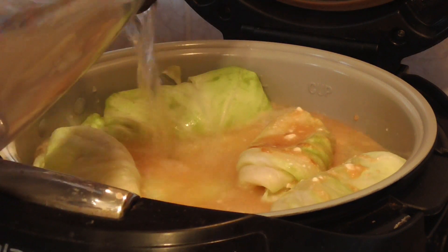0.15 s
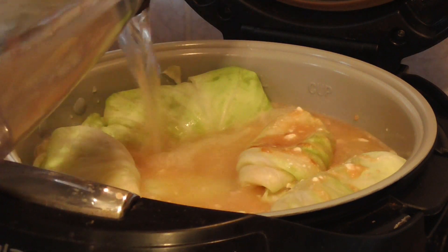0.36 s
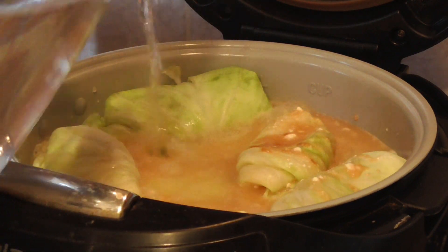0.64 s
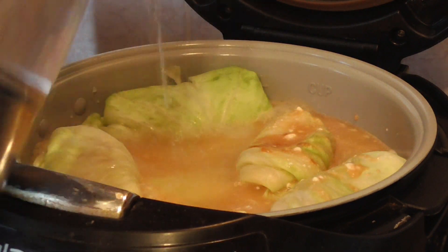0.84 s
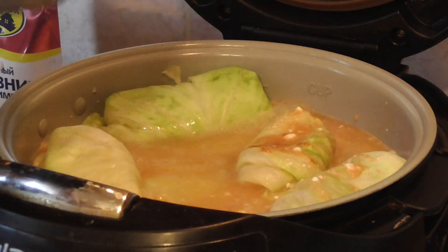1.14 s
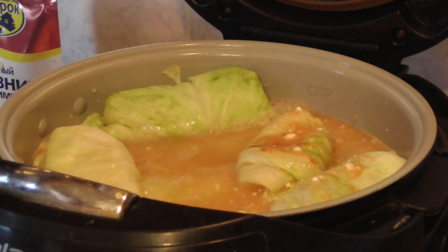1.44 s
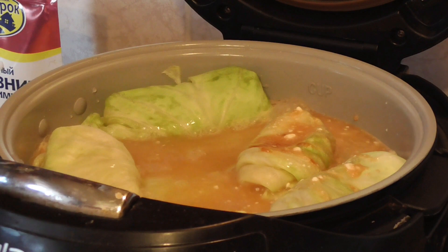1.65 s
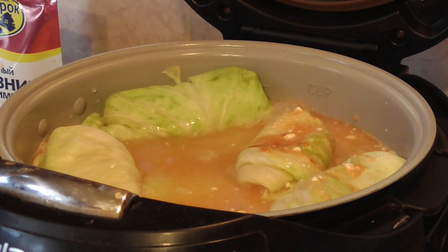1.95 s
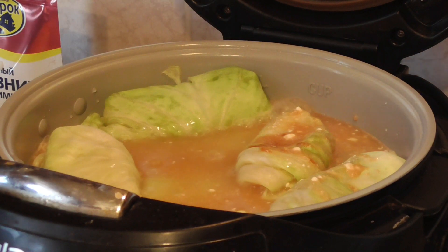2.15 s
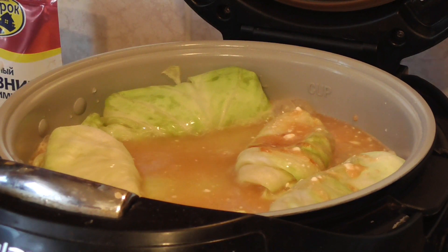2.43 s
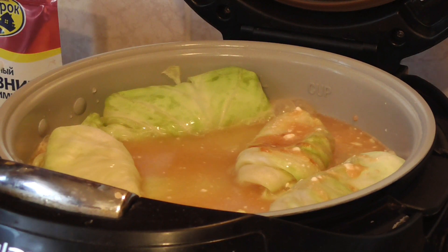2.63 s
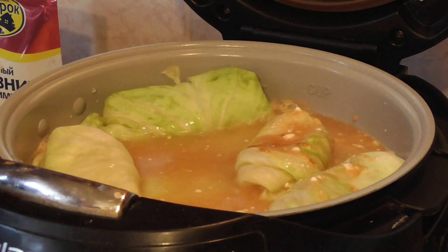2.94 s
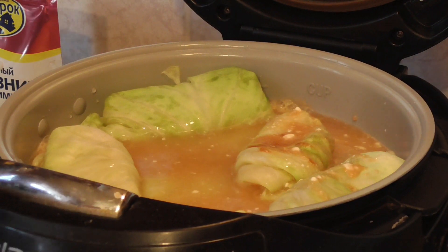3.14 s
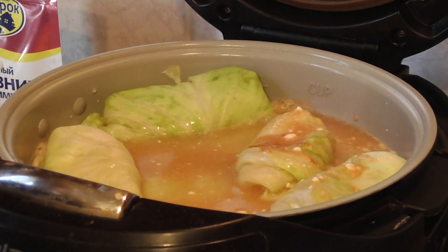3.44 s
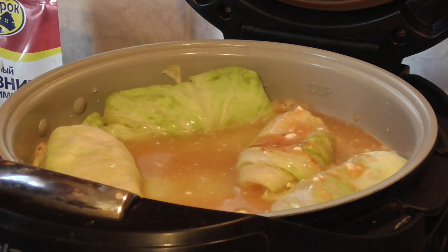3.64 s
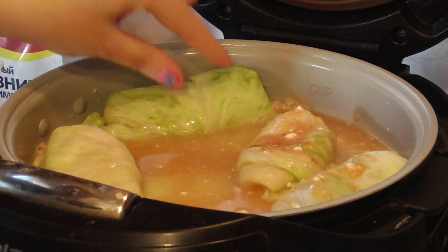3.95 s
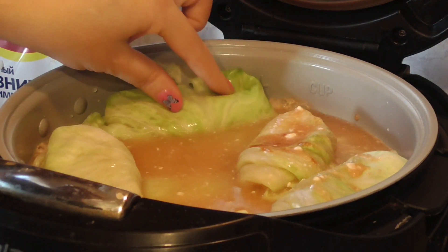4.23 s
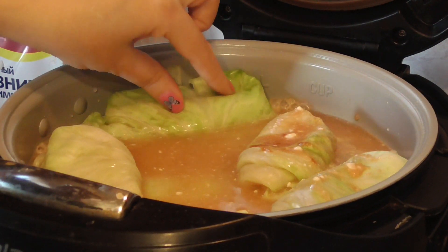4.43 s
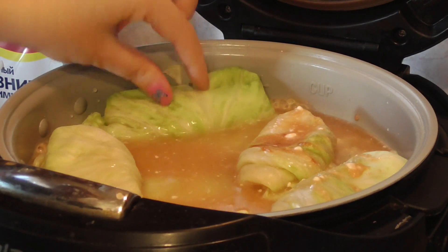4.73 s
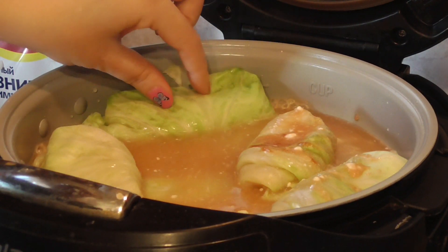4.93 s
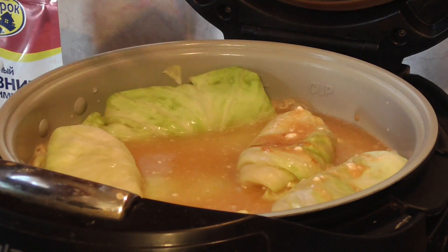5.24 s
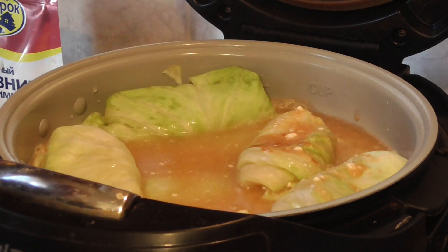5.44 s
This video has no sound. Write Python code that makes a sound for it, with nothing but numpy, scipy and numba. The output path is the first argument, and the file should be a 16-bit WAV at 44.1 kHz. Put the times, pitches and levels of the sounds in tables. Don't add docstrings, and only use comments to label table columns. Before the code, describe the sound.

Close bubbling pour ends with a jug thumped down, followed by a wooden clatter, a hard door slam, and quiet fridge hum.

```python
import sys
import numpy as np
from scipy import signal
from scipy.fft import rfft, irfft
from scipy.io import wavfile
from scipy.ndimage import uniform_filter1d
from numba import njit

SR = 44100
rng = np.random.default_rng(int(sys.argv[2]) if len(sys.argv) > 2 else 0)


def amplitude_ratio(level_db):
    exponent = np.asarray(level_db, float) / 20
    return 10 ** exponent


def inscribe(sig):
    pcm = np.round(np.clip(np.atleast_2d(sig).T, -1, 1) * 32767)
    wavfile.write(sys.argv[1], SR, pcm.astype(np.int16))


N = 246078


def at(table, hz):
    table = np.array(table, float)
    return np.interp(np.log(np.maximum(hz, 1)), np.log(table[:, 0]), table[:, 1])


def unit(x):
    return x / np.sqrt(np.mean(x ** 2))


def colour(x, table):
    size = x.shape[-1]
    return irfft(rfft(x) * amplitude_ratio(at(table, np.fft.rfftfreq(size, 1 / SR))), size)


# (frequency [Hz], likeness [0-1])
LIKENESS = [(60, 0.7), (300, 0.79), (700, 0.33), (3000, 0.24), (7000, 0), (15000, 0)]


def wide_noise(size):
    like = np.clip(at(LIKENESS, np.fft.rfftfreq(size, 1 / SR)), 0, 1)
    mid, side = rfft(rng.standard_normal((2, size))) * np.sqrt([1 + like, 1 - like])
    return irfft([mid + side, mid - side], size) / np.sqrt(2)


def narrow_noise(size, width):
    mid, side = rng.standard_normal((2, size))
    return mid + width * side * np.array([[1], [-1]])


def walk(rate_hz):
    hold = int(SR / rate_hz)
    return uniform_filter1d(np.repeat(rng.standard_normal(N // hold + 1), hold), hold)[:N]


def add(out, s, sound, pan_db):
    i = int(s * SR)
    sound = np.atleast_2d(sound)[:, :N - i]
    out[:, i:i + sound.shape[1]] += sound * amplitude_ratio(np.array([[pan_db], [-pan_db]]) / 2)


@njit
def grains(start, hz, cycles, glide, size, length, rate):
    out = np.zeros(length)
    for k in range(len(start)):
        step, phase, a = 2 * np.pi * hz[k] / rate, 0., size[k]
        life = cycles[k] * rate / hz[k]
        for i in range(start[k], min(start[k] + int(3 * life), length)):
            out[i] += a * np.sin(phase)
            phase += step
            step *= 1 + glide / life
            a *= np.exp(-2 / life)
    return out


# (time [s], flow [dB])
FLOW = [
    (0, 0),
    (0.2, -3.5),
    (0.31, -0.5),
    (0.45, -1.5),
    (0.79, 0.5),
    (0.87, 2.5),
    (0.98, 6),
    (1.04, -6),
    (1.25, -19),
    (2.15, -20.5),
]


def swarm(level_db, hz, spread_oct, cycles, rate_hz, sizes_db, glide):
    shower_s = 2.2
    when, pitch, rank, place = rng.random((8000, 4))[:int(rate_hz * shower_s)].T
    start = (when * shower_s * SR).astype(np.int64)
    pitch_hz = np.clip(hz * 2 ** (spread_oct * (2 * pitch - 1)), 100, 16000)
    size = amplitude_ratio(-sizes_db * np.log(1 - 0.73 * rank))
    cycles = np.full(len(size), cycles)
    both = []
    for side in (.8, -.8):
        one_side = size * np.sqrt(1 + side * (place - .5))
        both.append(grains(start, pitch_hz, cycles, glide, one_side, N, 1. * SR))
    rms = np.sqrt(np.mean(both[0][:int(shower_s * SR)] ** 2))
    flowing = np.arange(N) < FLOW[-1][0] * SR
    return np.array(both) / rms * amplitude_ratio(level_db) * flowing


def stream():
    t = np.arange(N) / SR
    flow_db = np.interp(t, *np.transpose(FLOW))
    clump_db, clumps_hz = 4.5, 45
    plop_db = -56.5 + 0.93 * flow_db + clump_db * walk(clumps_hz)
    bubble_db = -60 + flow_db + clump_db * walk(clumps_hz)
    fizz_db = -61.5 + 1.3 * flow_db + clump_db * walk(clumps_hz)
    foam_db = -65.5 - 6 * np.maximum(t - 1, 0)
    fine_db = 10 * np.log10(amplitude_ratio(2 * fizz_db) + amplitude_ratio(2 * foam_db))
    out = swarm(plop_db, hz=1250, spread_oct=1.3, cycles=3., rate_hz=700, sizes_db=3.5, glide=.1)
    out += swarm(bubble_db, hz=4020, spread_oct=0.4, cycles=9., rate_hz=700, sizes_db=5.5, glide=0.13)
    out += swarm(fine_db, hz=10500, spread_oct=.5, cycles=4., rate_hz=3500, sizes_db=3., glide=.05)
    return out


def bursts(table, gain_db, t60_s, spray_db):
    out, size = np.zeros((2, N)), 2048
    t, f = np.arange(size) / SR, np.fft.rfftfreq(size, 1 / SR) + 1
    fade = np.exp(-np.log(1000) * t / max(t60_s, .002)) * np.minimum(t / 0.0013, 1)
    splatter = .11 * np.exp(-t / .012) * np.minimum(t / .002, 1)
    for s, db, hz, *pan_db in table:
        ring = np.sin(2 * np.pi * hz * t * (1 + 4 * t)) * min(2500 / hz, .8)
        peak = np.exp(-(np.log2(f / hz) / 0.3) ** 2)
        skirts = 0.42 * np.minimum(f / hz, hz / f) ** .5 * (f > 350)
        spray = unit(irfft(rfft(narrow_noise(size, width=0.52)) * (peak + skirts), size))
        burst = .5 * ring * fade + amplitude_ratio(spray_db) * 0.56 * spray * (fade + splatter)
        add(out, s, amplitude_ratio(db + gain_db) * burst, sum(pan_db))
    return out


# (time [s], peak level [dB], pitch [Hz], left minus right [dB])
POPS = [(0.021, -30, 10250, 0.5), (0.0332, -30, 9550, -4), (0.0385, -33, 9800, 2), (0.0435, -34, 9800, 0.0),
        (0.1186, -40, 9880, 1), (0.1645, -43, 7300, 0.0), (0.2059, -43, 9570, 0.0), (0.2665, -31, 10500, 1),
        (0.274, -28, 9800, 1), (0.2947, -36, 12100, -2), (0.3182, -32, 10400, -0.5),
        (0.3411, -37, 9060, 0.0), (0.3674, -33, 8850, 2), (0.377, -21.5, 8830, 1),
        (0.4304, -35, 12100, -0.5), (0.5354, -29.5, 9640, 0.0), (0.5643, -36, 9350, 0.0),
        (0.5731, -37, 9060, 3), (0.583, -37, 12500, 0.0), (0.6195, -20.5, 11800, -1.5),
        (0.639, -35, 9870, 1), (0.6473, -33, 8700, 0.0), (0.6878, -31.5, 10400, 0.0),
        (0.71, -28, 11400, -1), (0.7387, -30, 8750, 0.0), (0.767, -35, 12700, -4), (0.8095, -30, 9000, 4),
        (0.8374, -28, 9400, 0.0), (0.8415, -25, 11500, -0.5), (0.8468, -22, 11300, -1.0),
        (0.8724, -31, 6700, 0.0), (0.9225, -28, 11900, -2.0), (0.9315, -33, 6950, -2.0),
        (0.9567, -35, 9500, 0.0)]
# (time [s], peak level [dB], pitch [Hz], left minus right [dB])
BUBBLES = [(0.112, -44, 3200, 0.0), (0.1195, -44, 3460, 0.0), (0.166, -51, 3540, 9),
           (0.1905, -43.5, 3880, 2), (0.2109, -53, 3570, 0.0), (0.2374, -40.5, 3400, 4),
           (0.2493, -37, 3400, -0.5), (0.2663, -37, 4620, 0.5), (0.3403, -45, 3600, 3),
           (0.407, -39, 3550, -1), (0.4713, -36.5, 3920, -1), (0.5087, -37.5, 3770, 0.5),
           (0.5806, -38, 4450, -1.0), (0.7812, -37.5, 4230, -8), (0.8076, -28, 4060, 0.5),
           (0.8105, -29, 4300, 0.5), (0.873, -32, 3500, 1), (0.8865, -25.5, 4210, -1),
           (0.9314, -31, 4250, 0.5), (0.9554, -52, 3450, -1.0), (0.9835, -37, 5600, -0.5),
           (0.997, -45, 3900, -0.5), (1.0114, -40.5, 4040, 0.5)]
# (time [s], peak level [dB], pitch [Hz])
TICKS = [(1.2555, -49, 7050), (1.4874, -49, 6870), (1.4995, -47, 11200), (1.8027, -50, 10600),
         (1.947, -45, 11800), (2.0373, -51, 8500), (2.087, -47, 10500), (2.1888, -43, 8400),
         (2.2114, -48, 5000), (3.1314, -49, 7500), (3.5932, -45, 12450), (3.6107, -39.5, 7640),
         (4.0746, -50, 14400), (4.116, -50, 7500), (4.6144, -49, 11800), (4.6773, -47, 6500),
         (5.01, -51, 15000), (5.3114, -43, 6910), (5.5035, -48.5, 9320)]
# (time [s], peak level [dB], pitch [Hz])
DRIPS = [
    (1.0444, -45, 4560),
    (1.18, -50, 2440),
    (2.124, -51, 2100),
]
# (time [s], peak level [dB], pitch [Hz])
PLOPS = [(.058, -33, 1230), (.212, -29, 1140), (.238, -33, 1650), (.283, -31, 1350), (.318, -34, 690),
         (.376, -36, 1310), (.4055, -26.5, 1260), (.408, -28.5, 640), (.42, -29, 1500), (.459, -31.5, 1000),
         (.637, -26, 930), (.665, -29, 920), (.74, -30, 1490), (.792, -28, 1500), (.807, -33.5, 1100),
         (.887, -28, 1190), (1.213, -35.5, 774), (1.565, -38.5, 805), (3.612, -39, 1160),
         (4.618, -41.5, 1110)]


def water():
    out = stream()
    out += bursts(POPS, gain_db=12.9, t60_s=0.0074, spray_db=-8)
    out += bursts(BUBBLES, gain_db=3.8, t60_s=0.018, spray_db=-4)
    out += bursts(TICKS, gain_db=0.1, t60_s=0.0097, spray_db=3.9)
    out += bursts(DRIPS, gain_db=-3, t60_s=.012, spray_db=8)
    out += bursts(PLOPS, gain_db=-8, t60_s=.022, spray_db=3)
    return out


# (frequency [Hz], density [dB per Hz])
DULL_CRACK = [(880, -35), (1500, -5), (2720, -11.5), (3060, -10), (5020, -10.5), (6560, -17), (10700, -18),
              (16000, -38)]


def blows(table, body, rise_s, crack_s, low_hz, edge=DULL_CRACK, edge_pan_db=0., late_samples=0):
    out, t = np.zeros((2, N)), np.arange(int(.5 * SR)) / SR
    hz, mode_db, t60_s = np.transpose(body)[:, :, None]
    high_pass = signal.butter(2, low_hz, "high", fs=SR, output="sos")
    body_size = np.sqrt(np.sum(amplitude_ratio(2 * mode_db)))
    for s, db, crack_db, pan_db, *tilt_db in table:
        spread = np.array([1.5, .012, .35])[:, None, None]  # dB, share of pitch, rad
        gain_db, detune, phase = rng.standard_normal((3, len(body), 1)) * spread
        size = amplitude_ratio(mode_db + gain_db + sum(tilt_db) * np.log2(hz / 550))
        modes = size * np.sin(2 * np.pi * hz * (1 + detune) * t + phase) * 1000 ** (-t / t60_s)
        push = np.minimum(t / rise_s, 1) ** 2
        ring = signal.sosfilt(high_pass, np.sum(modes, axis=0) * push)
        crack = unit(colour(narrow_noise(len(t), width=0.47), edge))
        crack = crack * 1000 ** (-t / crack_s) * np.minimum(3 * t / rise_s, 1) / 2
        right = np.roll(crack[1], late_samples) * amplitude_ratio(-edge_pan_db / 2)
        crack = np.array([crack[0] * amplitude_ratio(edge_pan_db / 2), right])
        add(out, s, amplitude_ratio(db) * ring / body_size + amplitude_ratio(crack_db) * crack, pan_db)
    return out


# (time [s], body peak level [dB], crack peak level [dB], left minus right [dB])
BUMP = [
    (0.539, -19.5, -41.5, 1),
]
# (time [s], body peak level [dB], crack peak level [dB], left minus right [dB])
REBOUND = [
    (0.555, -24.5, -46, 2),
    (0.581, -26.5, -54, -1),
]
# (frequency [Hz], level [dB], t60 [s])
JUG = [(107.7, 10, 0.34), (199, -1, 0.29), (258, -2, 0.2), (376, 4.5, 0.058), (496, 0.5, 0.1),
       (585, 8.5, 0.029), (982, -7, 0.046), (1310, -1, 0.031)]


def jug_bump():
    out = blows(BUMP, JUG, rise_s=0.00247, crack_s=0.072, low_hz=60)
    return out + blows(REBOUND, JUG, rise_s=0.002, crack_s=0.063, low_hz=215)


# (time [s], body peak level [dB], crack peak level [dB], left minus right [dB], tilt [dB per octave])
SET_DOWN = [
    (.9188, -9.5, -32, 4.5, 1.5),
    (.929, -13.5, -33, 2, -0.039),
    (.940, -19.5, -36.5, 4, -1.5),
    (.956, -23, -35, -2, -1.4),
]
# (frequency [Hz], level [dB], t60 [s])
COUNTER = [(186.8, -13.5, 0.34), (240, 0, 0.12), (507, 13, 0.013), (661, 7.5, 0.039), (763, 8, 0.021),
           (945, 0, 0.032), (1160, 5.5, 0.017), (1520, -21, 0.085), (1900, -36, .03)]


def set_down():
    return blows(SET_DOWN, COUNTER, rise_s=0.00088, crack_s=0.039, low_hz=118)


# (time [s], body peak level [dB], crack peak level [dB], left minus right [dB], tilt [dB per octave])
RATTLE = [(2.243, -8.5, -33.5, 4.1, 0.2), (2.288, -7, -33, 3.7, 0), (2.3, -18, -34, 3, -5),
          (2.316, -3.5, -24.5, 3.5, -1.5), (2.3215, -12, -36, 3, -4), (2.33, -12, -38, 3, 4),
          (2.3365, -9, -31, 3, -1), (2.349, -13, -40, 2.5, 0.1), (2.369, -14.5, -36, 2.5, 0.5),
          (2.376, -21, -44, 2.5, 2), (2.388, -15, -32.5, 3, 0.1), (2.399, -20.5, -37, 2.8, 4)]
# (time [s], body peak level [dB], crack peak level [dB], left minus right [dB])
SCRAPE = [
    (2.519, -41, -53, 6),
    (2.5355, -24, -47, 3),
    (2.547, -30, -44, 7),
    (2.5555, -18, -45.5, 8),
    (2.567, -21, -33.5, -6),
]
# (frequency [Hz], level [dB], t60 [s])
BOX = [(238, -23, 0.12), (435, 7, 0.075), (488, -5.5, 0.21), (583, 14, 0.037), (748, 4, 0.056),
       (953, 4.5, 0.034), (1072, -4, 0.052), (1330, 1.5, 0.045), (1570, -1.5, 0.026), (2030, -4, 0.023),
       (2590, 0.5, 0.014)]


def wooden_rattle():
    out = blows(RATTLE, BOX, rise_s=0.0025, crack_s=0.11, low_hz=272)
    return out + blows(SCRAPE, BOX, rise_s=0.0013, crack_s=0.57, low_hz=244)


# (time [s], body peak level [dB], crack peak level [dB], left minus right [dB], tilt [dB per octave])
SLAM = [
    (2.5735, -3.5, -10, 4.2, 0.23),
    (2.5842, -8.5, -5.5, 1.8, -0.17),
    (2.607, -17.5, -21, 1.4, 1.4),
    (2.6135, -12.5, -19, 1.8, -0.15),
    (2.641, -15, -39, 1.5, -1.9),
]
# (frequency [Hz], level [dB], t60 [s])
DOOR = [(200, -27, 0.14), (234.8, -7.5, 0.212), (264, -8.5, 0.2), (366.6, -4, 0.14), (439, 2.5, 0.037),
        (564, -1.5, 0.047), (601, 3.5, 0.069), (685, 2, 0.08), (822, -1, 0.066), (930, 6.5, 0.032),
        (1248, 1, 0.03), (1399, 2, 0.026), (1750, -14, 0.024), (2100, -1.5, 0.026)]
# (frequency [Hz], density [dB per Hz])
CRACK = [(90, -46.5), (300, -8.5), (900, -11), (1500, -14.5), (2500, -15), (7600, -11.5), (13400, -13.5),
         (16000, -40.5)]


def slam():
    return blows(SLAM, DOOR, rise_s=0.0026, crack_s=0.046, low_hz=122,
                 edge=CRACK, edge_pan_db=-2.0, late_samples=1)


def gusts(table, rise_db_s, spectrum, grain_db, grain_hz, width):
    noise = unit(colour(narrow_noise(N, width), spectrum)) * amplitude_ratio(grain_db * walk(grain_hz))
    t, power = np.arange(N) / SR, 0
    for s, db, fade_db_s in table:
        drop_db = np.maximum(rise_db_s * (s - t), fade_db_s * (t - s))
        power = power + amplitude_ratio(db - drop_db) ** 2
    return noise * np.sqrt(power)


# (time [s], level [dB], fade [dB per s])
BOOM = [
    (.79, -49.5, 90),
    (.925, -33, 174),
    (2.29, -38, 101),
    (2.34, -29.5, 132),
    (2.39, -49, 221),
    (2.576, -36, 110),
]
# (frequency [Hz], density [dB per Hz])
BOOM_COLOUR = [(18, -53), (30, -16), (86, -7.5), (112, -1.5), (172, -7.5), (220, 3.5), (300, -4),
               (390, -4.5), (660, -120)]


def boom():
    return gusts(BOOM, 2500, BOOM_COLOUR, grain_db=-2.0, grain_hz=16, width=0.16)


def pan_ring():
    t = np.arange(N) / SR
    hz, from_s, level_db, fade_db_s = 508.5, 2.82, -50.5, 22
    touched_s, touch_db = 3.17, -2
    db = level_db - fade_db_s * (t - from_s) + touch_db * np.clip((t - touched_s) / .04, 0, 1)
    onset = np.clip((t - from_s) / 0.022 + .5, 0, 1)
    return np.sqrt(2) * amplitude_ratio(db) * onset * np.sin(2 * np.pi * hz * t)


# (time [s], body peak level [dB], crack peak level [dB], left minus right [dB])
CLINK = [
    (2.0995, -44, -45, 4),
]
# (frequency [Hz], level [dB], t60 [s])
SPOON = [(1330, -4, .05), (2100, 0.1, 0.051), (3300, -6, .04), (4300, -4, .04), (5600, -5, .03)]


def clink():
    return blows(CLINK, SPOON, rise_s=0.0018, crack_s=0.08, low_hz=800)


# (time [s], body peak level [dB], crack peak level [dB], left minus right [dB])
TAPS = [
    (3.209, -30.5, -59.5, 0),
    (3.266, -26, -57.5, 0.005),
]
# (frequency [Hz], level [dB], t60 [s])
BOARD = [(214, -3, 0.088), (308, 13, 0.028), (391, 1, 0.072), (530, -5.5, 0.057), (645, -15, 0.061)]


def taps():
    return blows(TAPS, BOARD, rise_s=0.0022, crack_s=0.091, low_hz=150)


# (time [s], body peak level [dB], crack peak level [dB], left minus right [dB])
TOUCH = [
    (3.9725, -31.5, -65, 3),
]
# (frequency [Hz], level [dB], t60 [s])
RIM = [(429, 2.5, 0.052), (512, 8, 0.052), (626, -11.5, 0.13)]


def rim_touch():
    return blows(TOUCH, RIM, rise_s=0.0021, crack_s=.06, low_hz=300)


# (time [s], level [dB], fade [dB per s])
SLEEVE = [
    (2.79, -62.5, 28),
    (3.61, -51, 113),
    (4.005, -55.5, 200),
    (4.036, -57.5, 200),
]
# (frequency [Hz], density [dB per Hz])
SLEEVE_COLOUR = [(290, -37), (500, 2), (933, -8), (1190, -5.5), (1930, -14), (11300, -17), (14200, -29),
                 (16000, -42)]


def sleeve():
    return gusts(SLEEVE, 600, SLEEVE_COLOUR, grain_db=2.0, grain_hz=230, width=0.56)


# (multiple of 49.22 Hz, level [dB])
FRIDGE = [(1, -26), (2, -16), (3, -10), (4, -4.5), (5, -9.5), (6, 2), (7, -4), (8, -12.5), (9, -19.5),
          (10, -22.5), (11, -22.5), (12, -28), (13, -33), (14, -20), (15, -31), (16, -24.5), (18, -20.5),
          (19, -47), (21, -17.5), (22, -33), (23, -19.5), (24, -20.5)]


def fridge_hum():
    turn = 2 * np.pi * np.cumsum(49.22 * (1 + 0.00086 * walk(1.736))) / SR
    hum = 0
    for k, db in FRIDGE:
        sides_rad = np.array([[.15], [-.15]]) * rng.standard_normal()
        hum = hum + amplitude_ratio(db + 1.8 * walk(5)) * np.sin(k * turn + 0.23 * k * k + sides_rad)
    return amplitude_ratio(-57.5) * np.sqrt(2) * hum


# (frequency [Hz], level [dB])
WHINE = [
    (1922, -83),
    (3494, -83),
]
# (frequency [Hz], density [dB per Hz])
AIR = [(15, -72), (70, -39), (105, -13), (185, -11), (243, -1), (295, -8.5), (438, -11.5), (723, -15.5),
       (896, -15), (1170, -16), (1260, -17), (1800, -28), (2340, -81), (3960, -120)]
# (frequency [Hz], density [dB per Hz])
HISS = [(1060, -14), (1800, -45), (1950, -2), (2460, -7.5), (3200, -7), (3480, -2.5), (3770, -7),
        (4600, -3), (5300, -11), (6130, -11), (10000, -5), (13300, -6.5), (15000, -11.5), (16000, -16)]


def air_and_hiss():
    t = np.arange(N) / SR
    out = amplitude_ratio(-57) * unit(colour(wide_noise(N), AIR)) * amplitude_ratio(.3 * walk(3))
    for hz, db in WHINE:
        out = out + amplitude_ratio(db + 1.5 + 0.62 * walk(11)) * np.sin(2 * np.pi * hz * t + 1.6 * walk(13))
    return out + amplitude_ratio(-67) * unit(colour(wide_noise(N), HISS))


# (time [s], level [dB], fade [dB per s])
RUMBLE = [
    (0.001, -67.5, 3),
]
# (frequency [Hz], density [dB per Hz])
RUMBLE_COLOUR = [(15, -23), (30, -4), (50, -1), (80, -4.5), (120, -10), (200, -50)]


def rumble():
    return gusts(RUMBLE, 2500, RUMBLE_COLOUR, grain_db=4.0, grain_hz=4.5, width=0.28)


# (frequency [Hz], t60 [s])
ROOM_T60 = [(100, 0.6), (300, 0.4), (1000, 0.49), (4000, 0.4), (8000, 0.42), (14000, 0.26)]


def kitchen(x, wet_db):
    t, tail = np.arange(int(.7 * SR)) / SR, 0
    spectrum, f = rfft(wide_noise(len(t))), np.fft.rfftfreq(len(t), 1 / SR)
    for hz in 60 * 2 ** np.arange(0, 8.6, .5):
        band = np.clip(1 - 2 * np.abs(np.log2(np.maximum(f, 1) / hz)), 0, 1)
        tail = tail + irfft(spectrum * band, len(t)) * 1000 ** (-t / at(ROOM_T60, hz))
    tail = tail * np.clip((t - .003) / 0.0026, 0, 1)
    tail = tail / np.sqrt(np.sum(tail ** 2) / 2)
    return x + amplitude_ratio(wet_db) * signal.fftconvolve(x.mean(axis=0, keepdims=True), tail, axes=1)[:, :N]


def from_left(x):
    return np.array([x[0], np.roll(x[1], 1)])


def scene():
    pour = kitchen(water(), wet_db=-12)
    near = kitchen(jug_bump() + set_down(), wet_db=-12.0)
    far = wooden_rattle() + clink() + taps() + rim_touch()
    left = kitchen(from_left(far), wet_db=-8.0) + kitchen(from_left(slam()), wet_db=-7.5)
    background = fridge_hum() + air_and_hiss() + rumble()
    return pour + near + left + boom() + pan_ring() + sleeve() + background


def low_pass(x):
    return signal.sosfilt(signal.butter(12, 16650, fs=SR, output="sos"), x)


def record(dry):
    cut = signal.sosfilt(signal.ellip(6, .5, 50, 15700, fs=SR, output="sos"), dry)
    cut = signal.sosfilt(signal.butter(2, 40, "high", fs=SR, output="sos"), cut)
    threshold_db, duck_db_per_db, reaction_s = -32, 0.18, 0.071
    keep = np.exp(-1 / (reaction_s * SR))
    power = signal.lfilter([1 - keep], [1, -keep], np.mean(cut ** 2, axis=0))
    level_db = 10 * np.log10(power + 1e-12)
    mix = cut * amplitude_ratio(-duck_db_per_db * np.maximum(level_db - threshold_db, 0))
    return low_pass(mix)


dry = scene()
out = record(dry)
inscribe(out)
```